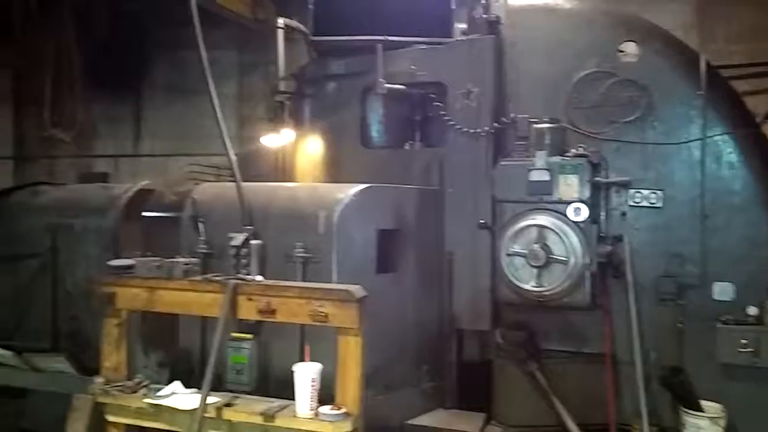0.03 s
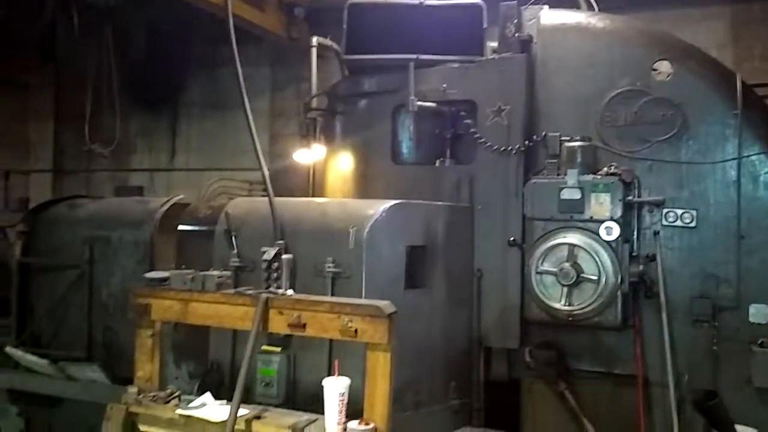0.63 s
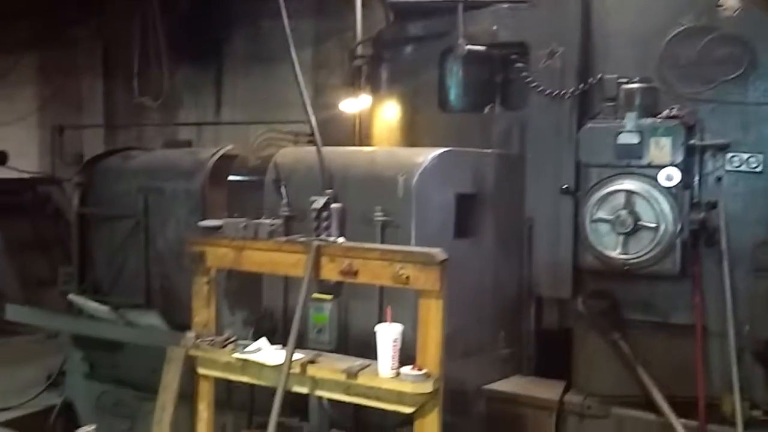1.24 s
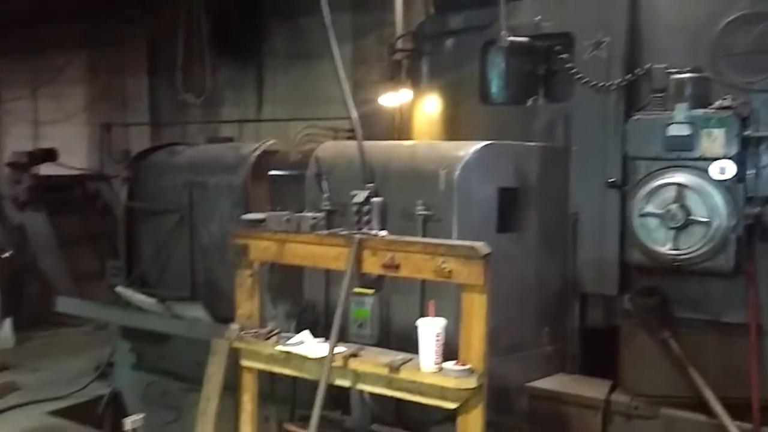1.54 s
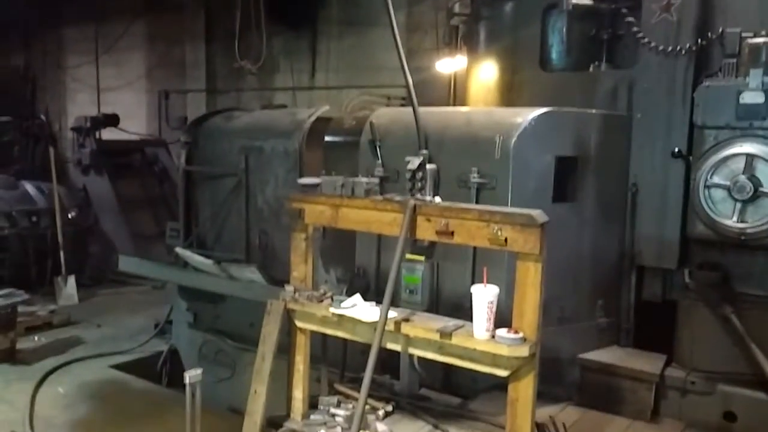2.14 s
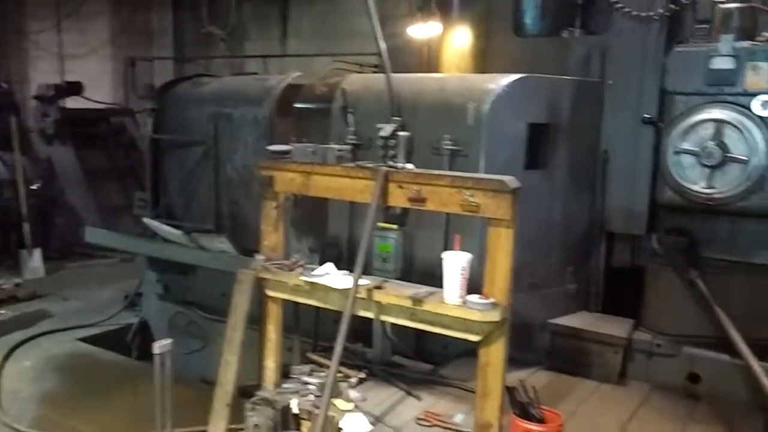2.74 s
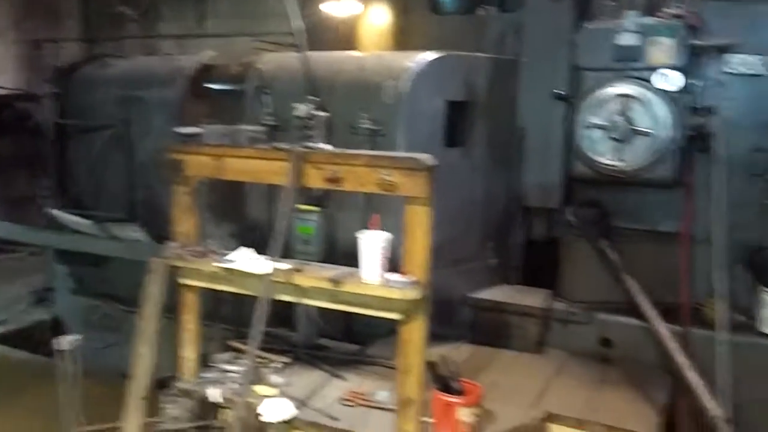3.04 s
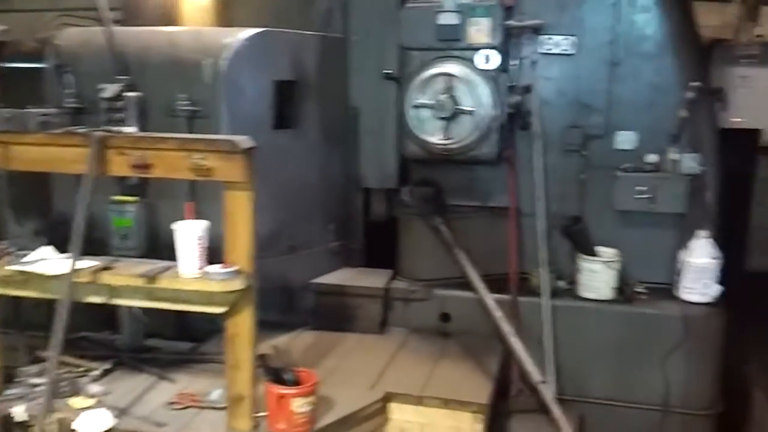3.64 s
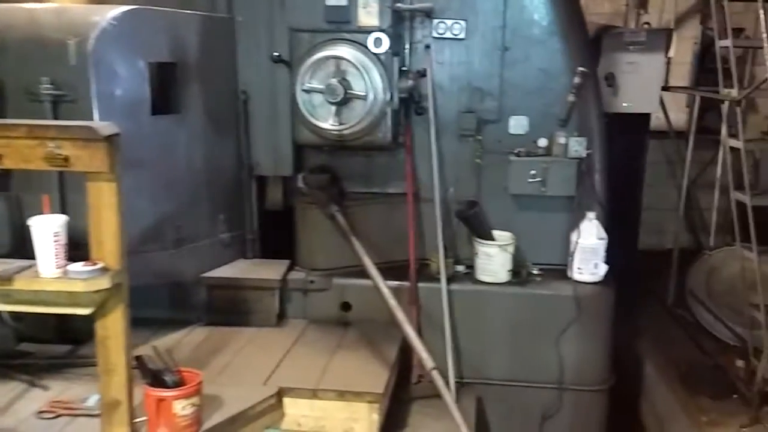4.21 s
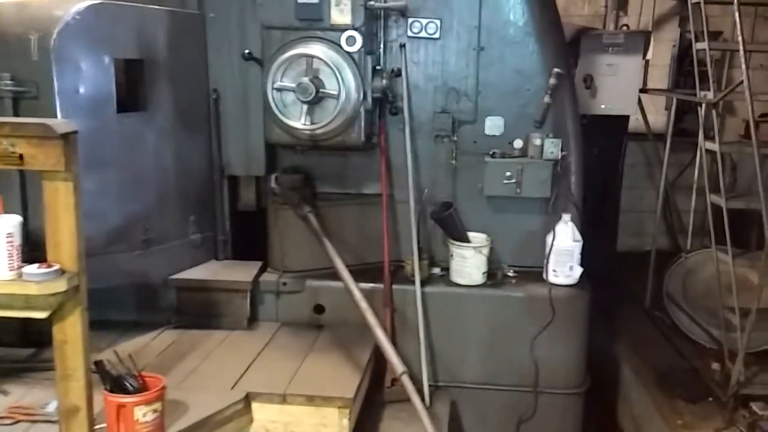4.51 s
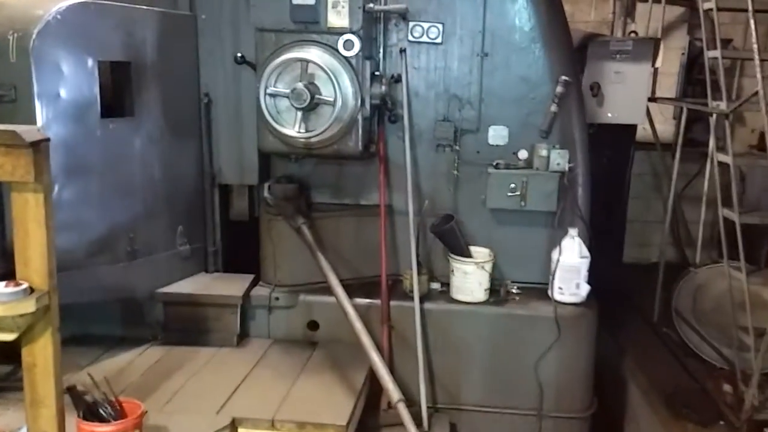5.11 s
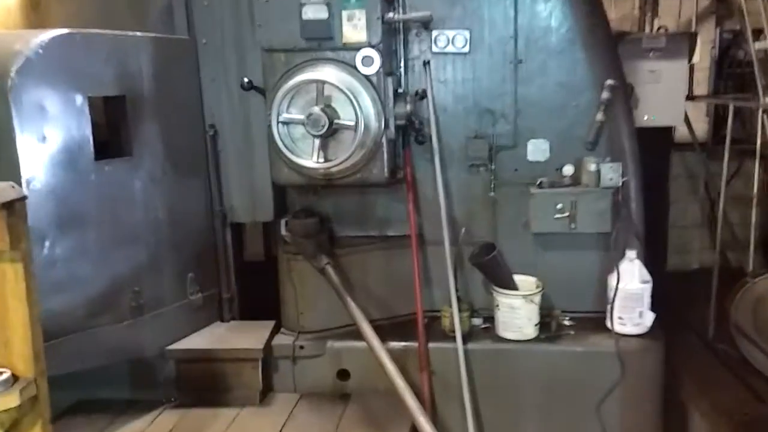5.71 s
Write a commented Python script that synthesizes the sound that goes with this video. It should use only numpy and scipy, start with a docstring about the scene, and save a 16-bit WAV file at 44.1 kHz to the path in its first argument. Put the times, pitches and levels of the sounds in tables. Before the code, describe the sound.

A big industrial grinder roars and drones in a workshop, swelling and easing, its coolant hiss dulling as a deep hum comes forward.

```python
"""A large surface grinder runs in a workshop, heard from a few steps away.
After half a second of silence it fades in with a broad surge: the wheel roars and drones on the work,
the housing rumbles, coolant spray hisses and the motor hums. The surge dies away and the grinding swells
and eases. Near 3 s the listener turns to the right. Just after 4 s the machine screens the spray, so the
hiss dulls, and a deep hum comes forward. Shortly before 5 s the wheel chatters for a moment."""
import sys
import numpy as np
from scipy import signal
from scipy.fft import rfft, irfft
from scipy.io import wavfile
from scipy.ndimage import uniform_filter1d

SR = 44100
rng = np.random.default_rng(int(sys.argv[2]) if len(sys.argv) > 2 else 0)


def dump(signal):
    """Clip the signal to [-1, 1] and save it as 16-bit WAV at the path in sys.argv[1]."""
    limited = np.clip(np.atleast_2d(signal).T, -1, 1)
    pcm = np.round(limited * 32767).astype(np.int16)
    wavfile.write(sys.argv[1], SR, pcm)


N = 254016
T = np.arange(N) / SR
HZ = np.fft.rfftfreq(N, 1 / SR)


def amp(db):
    """Turns decibels into a gain."""
    return 10 ** (np.asarray(db) / 20)


def unit(x):
    """Scales a signal to an average strength (rms) of 1."""
    return x / np.sqrt(np.mean(abs(x) ** 2) + 1e-20)


def curve(rows, column=1):
    """Joins the points of a timed table with straight lines."""
    rows = np.asarray(rows)
    return np.interp(T, rows[:, 0], rows[:, column])


def drift(rate_hz):
    """A smooth random wobble, up to about the given rate."""
    return unit(irfft(rfft(rng.standard_normal(N)) / (1 + (HZ / rate_hz) ** 4), N))


def colour(x, spectrum):
    """Makes some pitches of a noise stronger than others; the result has strength 1."""
    hz, db = np.transpose(spectrum)
    gain = amp(np.interp(np.log(HZ + 1), np.log(hz), db))
    return unit(irfft(rfft(x) * gain, N))


def grit(per_s, spread_db):
    """Many tiny impacts of uneven size."""
    size = amp(spread_db * np.minimum(rng.exponential(1, N), 4))
    return unit(size * rng.standard_normal(N) * (rng.random(N) < per_s / SR))


def patchy(x, depth_db, span_hz, span_s):
    """Adds small scraping swells, each over a short time and a narrow range of pitch."""
    hz, t, slices = signal.stft(x, SR, nperseg=1024, noverlap=768)
    patches = uniform_filter1d(rng.standard_normal(slices.shape), max(1, round(span_hz / hz[1])), axis=0)
    patches = unit(uniform_filter1d(patches, max(1, round(span_s / t[1])), axis=1))
    return signal.istft(slices * amp(depth_db * patches), SR, nperseg=1024, noverlap=768)[1][:N]


def tone(cycles, rough, width_hz):
    """A wavering tone: rough is the share that wanders (0 to 1), width_hz is how fast."""
    wander = unit(drift(width_hz) + 1j * drift(width_hz))
    steady = np.exp(2j * np.pi * (cycles + rng.random()))
    return np.sqrt(2) * ((np.sqrt(1 - rough) + np.sqrt(rough) * wander) * steady).real


# Where the listener faces: time_s, side (0 left, 1 right)
FACING_SIDE = [(.8, 0.12), (1.5, .05), (2.9, 0.042), (3.4, 0.72), (4.2, 0.96), (4.7, 1), (5.76, 1)]
def level(left_db, right_db, surge_db):
    """A part's level in dB: it follows the listener's turn and is lifted by the opening surge."""
    start_s, rise_s, hold_until_s, fall_s = 0.32, 0.56, 1.166, 0.24
    rise, fall = (T - start_s) / rise_s, 1 - (T - hold_until_s) / fall_s
    surge = np.clip(np.minimum(rise, fall), 0, 1)
    return left_db + (right_db - left_db) * curve(FACING_SIDE) + surge_db * surge


def tones(rows, cycles, rough, width_hz):
    """Several tones whose balance changes as the listener turns from left to right."""
    return sum(amp(level(left_db, right_db, surge_db=6)) * tone(multiple * cycles, rough, width_hz)
               for multiple, left_db, right_db in rows)


# Swells of the grinding: peak_s, half_length_s, roar_db, rumble_db, singing_db, rush_db
GRINDING_SWELLS = [(1.85, 0.42, 2, 1, 6.5, -2), (2.2, 0.13, 3, 3, -4, -3), (2.65, .3, 0, 2.5, 4, -1),
                   (3.41, 0.15, 5, 3, 1, -0.5), (3.912, 0.22, 2, 1, -1, 0.5),
                   (4.684, 0.18, -1, 1.5, 5.5, -1), (5.235, 0.25, 1.5, 6, -2.5, -1),
                   (5.658, 0.14, 1, 5, 1, 1.5)]
def swell(part):
    """How many dB the smooth swells raise or lower one part of the sound."""
    column = 2 + ["roar", "rumble", "singing", "rush"].index(part)
    return sum(row[column] * np.exp(-((T - row[0]) / row[1]) ** 2) for row in GRINDING_SWELLS)


# How far the machine blocks the hiss (0 to 1): time_s, spray_share, mist_share
SCREENING = [(4.16, 0.03, 0.07), (4.3, 0.67, 0.8), (4.9, 1, 0.9), (5.3, 0.66, 0.8), (5.5, 0.64, 1),
             (5.76, 0.56, .97)]
# Tone colours of the spray and the mist: pitch_hz, relative_db
SPRAY_COLOUR = [(3300, -55), (4400, -48), (5300, -13.5), (6200, -6.5), (7200, 1.5), (7800, 1), (8800, -5),
                (10000, -8.5), (11500, -15), (16000, -28)]
MIST_COLOUR = [(5000, -52), (8500, 2.5), (10000, 1.5), (11500, 0.5), (13700, 2), (15700, -5)]
def coolant():
    """Spray thrown off the wheel hisses and fine mist sizzles. Screening dims both, the mist most."""
    drops = rng.standard_normal(N) + 0.5 * grit(per_s=2800, spread_db=-0.5)
    spray_db = level(left_db=-26.5, right_db=-24.5, surge_db=0.5) - 8 * curve(SCREENING)
    spray = amp(spray_db + 0.51 * drift(rate_hz=18)) * colour(drops, SPRAY_COLOUR)
    mist_db = -30.5 - 15.5 * curve(SCREENING, column=2)
    return spray + amp(mist_db) * colour(rng.standard_normal(N), MIST_COLOUR)


# The motor's tones, with relative levels: multiple_of_motor_pitch, left_db, right_db
MOTOR_TONES = [(2, -43, -37), (4, -41, -40), (5, -41, -44), (10, -57, -48)]
# Tone colour of the soft boom: pitch_hz, relative_db
BOOM_COLOUR = [(30, -28), (48, -4), (90, 7.5), (135, 8), (170, 17), (260, -15), (1000, -60)]
def motor(pitch_hz=116.65, hum_hz=68, whine_hz=3845):
    """The running motor gives a set of tones, a deep hum over a soft boom, and an airy whine."""
    cycles = pitch_hz * T + 0.025 * drift(rate_hz=20)
    running = amp(-1.2) * tones(MOTOR_TONES, cycles, rough=0.7, width_hz=4.35)
    hum = tone(hum_hz * T, rough=0.076, width_hz=12) + amp(-13) * tone(48 * T, rough=0.5, width_hz=1.9)
    hum += amp(1.5) * colour(rng.standard_normal(N), BOOM_COLOUR)
    whine = amp(-1.5) * tone(whine_hz * T, rough=1, width_hz=48)
    whine += amp(-2) * tone(3920 * T, rough=1, width_hz=230)
    # the hum comes forward as the spray is screened
    hum_db = -59.5 + 19.2 * curve(SCREENING) + 1.2 * drift(rate_hz=2.7)
    return running + amp(hum_db) * hum + amp(-44) * curve(FACING_SIDE) ** 3 * whine


# Tone colour of the rumble: pitch_hz, relative_db
RUMBLE_COLOUR = [(30, -45), (60, -28), (100, -17), (130, -9), (175, -11), (220, -1.5), (320, 1.5),
                 (390, -2.5), (450, -11.5), (700, -40), (1500, -28), (6000, -70)]
# Moments when the rumble lurches: peak_s, lift_db
RUMBLE_LURCHES = [(2.15, 4), (2.67, 5), (2.809, 3), (3.31, 9.5), (3.61, 7.5), (3.87, 8), (4.12, 9),
                  (5.26, 5.5), (5.42, 5.5)]
# Ringing guard panels, with relative levels: pitch_hz, left_db, right_db
PANEL_TONES = [(211.5, -45, -38.5), (339, -42, -37.5), (712, -52, -40), (840, -60, -35.5),
               (1234, -52, -43.5), (1292, -50, -43)]
def housing(flutter_db=1.4, heave_db=1.3, lurch_s=0.03):
    """The heavy casing rumbles with a flutter and a few lurches, and its guard panels ring."""
    shake = colour(rng.standard_normal(N), RUMBLE_COLOUR)
    shake *= amp(flutter_db * drift(rate_hz=32) + heave_db * drift(rate_hz=4.5))
    lurch_db = sum(db * np.exp(-((T - peak_s) / lurch_s) ** 2) for peak_s, db in RUMBLE_LURCHES)
    rumble_db = level(left_db=-35, right_db=-32.5, surge_db=7.5) + swell("rumble") + lurch_db
    ringing = amp(-2.1) * tones(PANEL_TONES, T, rough=1, width_hz=7.2)
    return amp(rumble_db) * unit(shake) + ringing


# Three quick knocks of the wheel: peak_s, level_db, pitch_hz
CHATTER_KNOCKS = [(4.829, -17, 960), (4.848, -13.5, 860), (4.861, -19, 845)]
def chatter(half_length_s=0.0043):
    """For a few segments the wheel bites harder and the guard rings."""
    knocks = np.zeros(N)
    for peak_s, level_db, pitch_hz in CHATTER_KNOCKS:
        t = T - peak_s
        knocks += amp(level_db) * np.exp(-(t / half_length_s) ** 2) * np.sin(2 * np.pi * pitch_hz * t)
    return knocks


# Tones at which the guard sings: multiple_of_strike_rate, left_db, right_db
SINGING_TONES = [(13.97, -36, -36), (15.01, -43.5, -34.5)]
def singing_guard(strikes):
    """Uneven contact shakes the guard's tones and makes them throb together, most on the right side."""
    shake_cycles = 0.011 + 0.21 * curve(FACING_SIDE)
    throb_db = (1 + 1.65 * curve(FACING_SIDE)) * drift(rate_hz=20) + swell("singing")
    singing = np.zeros(N)
    for multiple, left_db, right_db in SINGING_TONES:
        shaken = tone(multiple * strikes + shake_cycles * drift(rate_hz=14.5), rough=0.4, width_hz=14)
        singing += amp(level(left_db, right_db, surge_db=4) + throb_db) * shaken
    return singing


# Tone colours of the roar and the gritty rush: pitch_hz, relative_db
ROAR_COLOUR = [(150, -51), (350, -9), (480, -2), (680, 4), (850, 1.5), (1000, 1.5), (1120, -4.5),
               (1400, -10.5), (1700, -8.5), (2200, -11), (2700, -18), (3200, -21), (5000, -37), (9000, -65)]
RUSH_COLOUR = [(100, -38), (175, 8), (240, -2), (320, 17.5), (420, 6.5), (600, 4), (1300, 9), (1600, 4.5),
               (2300, 4), (3250, -3.5), (4600, 1.5), (6400, 4), (8000, -10.5), (12000, -40)]
# The wheel's drone, with relative levels: multiple_of_strike_rate, left_db, right_db
DRONE_TONES = [(3.975, -37, -41), (4.96, -36, -39), (18, -51, -46), (21, -51, -41), (22, -55, -46.5),
               (25, -52, -62)]
def wheel(strike_hz=64.1):
    """The wheel's segments strike the work in turn: it roars, rushes and drones, and the guard sings."""
    strikes = np.cumsum(strike_hz * (1 + 0.001926 * drift(rate_hz=1.24))) / SR  # count so far
    bite = 1 + 0.096 * np.cos(2 * np.pi * strikes)
    roar = colour(bite * rng.standard_normal(N), ROAR_COLOUR) * amp(1.06 * drift(rate_hz=65))
    roar = unit(patchy(roar, depth_db=2.6, span_hz=260, span_s=0.06))
    roar *= amp(level(left_db=-32, right_db=-28.5, surge_db=8) + swell("roar"))
    grains = rng.standard_normal(N) + 0.43 * grit(per_s=2500, spread_db=0)
    rush_db = level(left_db=-34, right_db=-31, surge_db=15) + swell("rush") + 0.58 * drift(rate_hz=12)
    rush = amp(rush_db) * colour(bite * grains, RUSH_COLOUR)
    drone = amp(-1) * tones(DRONE_TONES, strikes, rough=0.86, width_hz=3.5)
    return roar + rush + drone + singing_guard(strikes)


def scene():
    """The whole machine, alike in both ears."""
    machine = housing() + wheel() + chatter() + motor() + coolant()
    return np.array([machine, machine])


def record(dry):
    """Opens with silence, fades in quickly and cuts off the very highest treble."""
    silent_until_s, fade_from_s, fade_to_s, cutoff_hz = 0.578, 0.54, 0.77, 15750
    fade = np.clip((T - fade_from_s) / (fade_to_s - fade_from_s), 0, 1) * (T > silent_until_s)
    low_pass = signal.firwin(801, cutoff_hz, window=("kaiser", 9), fs=SR)
    return signal.oaconvolve(dry * fade, low_pass[None], "same")


dry = scene()
out = record(dry)
dump(out)
```